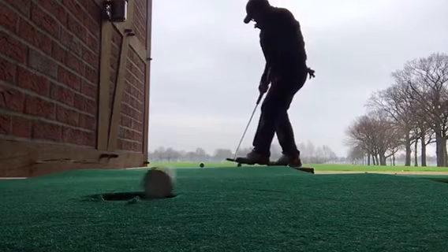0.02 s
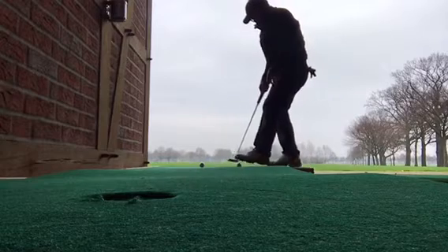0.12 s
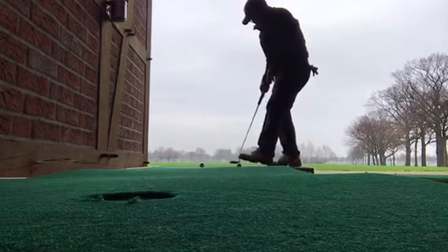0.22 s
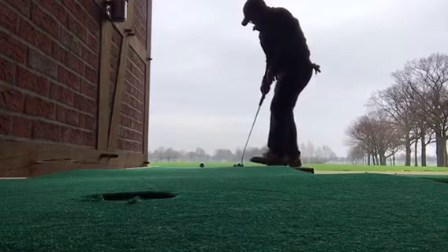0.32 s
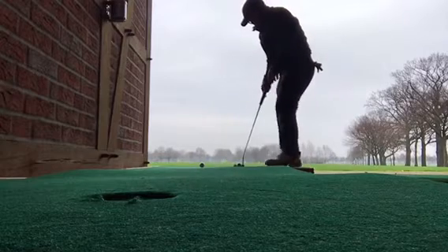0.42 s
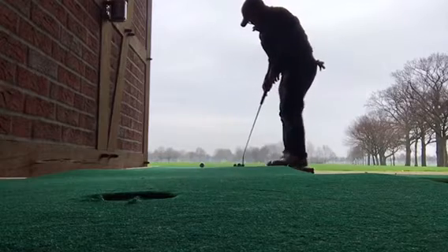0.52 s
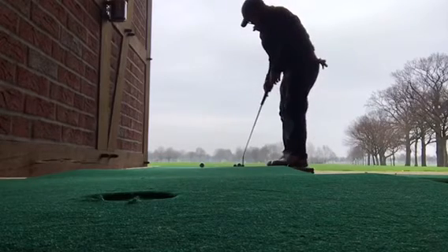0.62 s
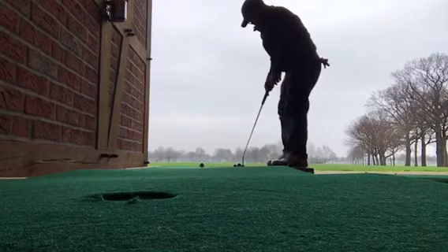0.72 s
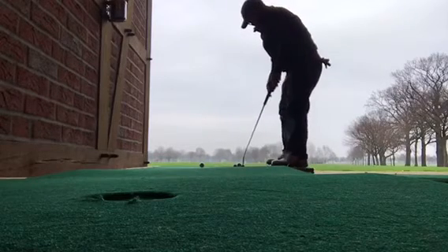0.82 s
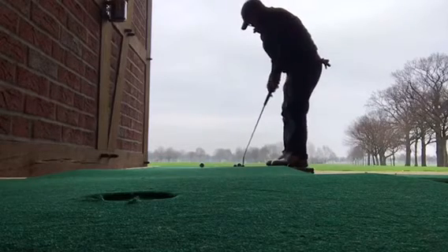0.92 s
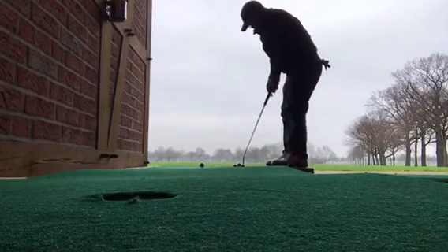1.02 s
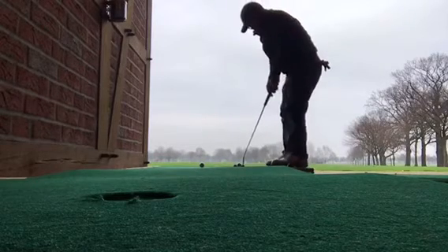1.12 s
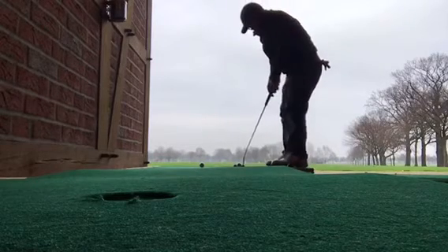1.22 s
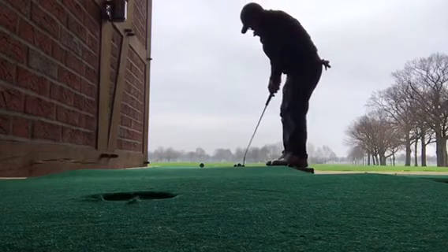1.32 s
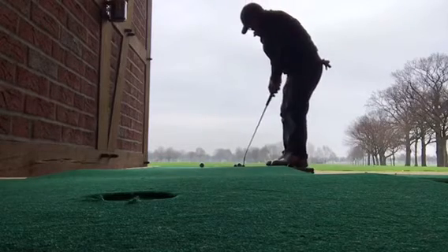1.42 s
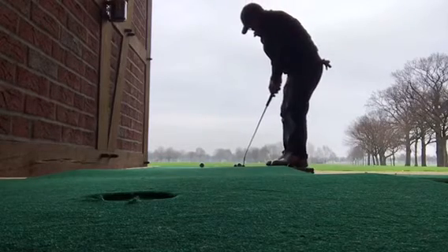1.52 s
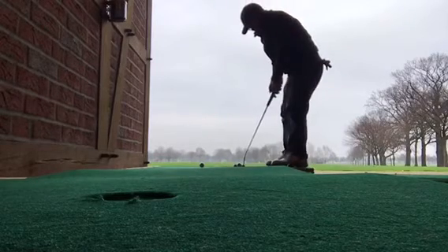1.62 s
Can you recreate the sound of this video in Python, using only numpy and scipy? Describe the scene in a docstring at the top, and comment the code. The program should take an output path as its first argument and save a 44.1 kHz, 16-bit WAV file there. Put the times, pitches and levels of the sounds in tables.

```python
"""A golf ball drops into a plastic cup and rattles and rolls round in it until it settles. Each knock excites
the damped modes of ball, cup and hollow deck, with noise bursts for the clack and crack of contact; rolling
drives the cup and deck modes with uneven noise. Before the drop the ball rumbles over artificial turf, and a
very short noise swells into the first knock. A brick wall answers with a diffuse tail, in quiet open air."""
import sys
import numpy as np
from scipy import signal
from scipy.fft import rfft, irfft, next_fast_len
from scipy.io import wavfile
from scipy.ndimage import map_coordinates

SR = 44100
rng = np.random.default_rng(int(sys.argv[2]) if len(sys.argv) > 2 else 0)


def dump_mix(stems):
    """Bounce the given channels to the path in sys.argv[1] as a 16-bit WAV at rate SR."""
    frames = np.atleast_2d(stems).T  # one column per channel
    limited = np.clip(frames, -1, 1)  # hard clip at full scale
    pcm = np.round(limited * 32767).astype(np.int16)
    wavfile.write(sys.argv[1], SR, pcm)


N = 74970


def amp(db):
    """Decibel law: the amplitude gain of a level in dB."""
    return 10 ** (np.asarray(db) / 20)


def unit(x):
    """Power normalisation: x at rms 1."""
    return x / np.sqrt(np.mean(x ** 2) + 1e-20)


def along(points, hz):
    """Logarithmic pitch scale: (frequency, value) points interpolated on a log frequency axis."""
    f, value = np.transpose(points)
    return np.interp(np.log(hz + 1), np.log(f + 1), value)


def filtered(x, response):
    """Linear filtering: the spectrum of x times a response of frequency."""
    size = next_fast_len(len(x) + SR // 2)
    spectrum = rfft(x, size) * response(np.fft.rfftfreq(size, 1 / SR))
    return irfft(spectrum, size)[:len(x)]


def noise(spectrum, size):
    """Spectral shaping: white noise coloured by a spectrum, at rms 1."""
    return unit(filtered(rng.standard_normal(size), lambda hz: amp(along(spectrum, hz))))


def wobble(rate):
    """Band-limited fluctuation: a smooth curve through random knots, rate knots a second."""
    knots = rng.standard_normal(int(N * rate / SR) + 4)
    return map_coordinates(knots, [np.arange(N) * rate / SR])


def rise(t, rise_s):
    """Finite contact time: the force builds up smoothly rather than at once."""
    return (1 - np.exp(-t / rise_s)) ** 2


def burst(colour, rise_s, t60, t):
    """Exponential decay: a coloured noise that dies by 60 dB in t60 seconds."""
    return amp(-60 * t / t60) * rise(t, rise_s) * noise(colour, size=len(t))


# scatter from knock to knock, in each mode: level [dB], log of the t60, starting phase [rad]
SCATTER_DB, DAMPING_SCATTER, PHASE_SCATTER_RAD = 3, 0.13, 0.4


def ring(modes, rise_s, detune, t):
    """Modal superposition: a blow sets off decaying sines, each a little different every time."""
    hz, db, t60 = np.transpose(modes)[:, :, None]
    size, tune, shift, damp = rng.standard_normal((4, len(modes), 1))
    fall_db = 60 * t / (t60 * np.exp(DAMPING_SCATTER * damp))
    phase = 2 * np.pi * hz * (1 + detune * tune) * t + PHASE_SCATTER_RAD * shift
    waves = amp(db + SCATTER_DB * size - fall_db) * np.sin(phase)
    return waves.sum(0) / np.linalg.norm(amp(db)) * rise(t, rise_s)


SOFT_HZ = 1500  # above this little passes


def driven(x, modes):
    """Forced resonance: x through a set of modes, with little treble passed, at rms 1."""
    def response(f):
        total = 0
        for k, (centre, db, t60) in enumerate(modes):
            width = np.log(1000) / (np.pi * t60)  # half-power bandwidth [Hz]
            damping = 1j * f * width
            # neighbouring modes have opposite signs
            total = total + (-1) ** k * amp(db) * damping / (centre ** 2 - f ** 2 + damping)
        return total / (1 + (f / SOFT_HZ) ** 4)
    return unit(filtered(x, response))


# spectrum of the open air: (frequency [Hz], relative level [dB per Hz])
AIR_SPECTRUM = [(13, -32), (40, -4.5), (125, -3), (239, -11), (560, -31.5), (2600, -43.5), (15500, -56)]
AIR_DB = -53


def air():
    """Stationary background noise: quiet outdoor rumble and hiss, gently uneven in level."""
    return amp(AIR_DB + 1.5 * wobble(4)) * noise(AIR_SPECTRUM, size=N)


# reverberation time of the wall and yard: (frequency [Hz], t60 [s])
WALL_T60 = [(150, 0.35), (800, 0.52), (3000, 0.065), (10000, 0.048)]
WALL_DB, WALL_DELAY_S = -17, 0.006


def wall(x):
    """Diffuse reverberation: a delayed noise tail in which each frequency dies at its own speed."""
    hz, t, cells = signal.stft(rng.standard_normal(SR // 2), SR, nperseg=256)
    decay = amp(-60 * t / along(WALL_T60, hz)[:, None])
    tail = signal.istft(cells * decay, SR, nperseg=256)[1]
    late = np.pad(x, (round(WALL_DELAY_S * SR), 0))
    reply = signal.fftconvolve(late, tail / np.linalg.norm(tail))[:N]
    return amp(WALL_DB) * reply


# rumble of the ball on the turf: (frequency [Hz], relative level [dB per Hz])
TURF_SPECTRUM = [(40, -23.5), (90, -5.5), (150, -1.5), (220, -12), (410, -25), (1200, -33.5), (4000, -81)]
TURF_DB, TURF_FADE_DB_PER_S = -38.5, 116  # level at the start, and its fall


def turf():
    """Rolling noise: the last low rumble on the turf dies as the ball tips over the edge."""
    t = np.arange(N) / SR
    return amp(TURF_DB - TURF_FADE_DB_PER_S * t) * rise(t, 0.002) * noise(TURF_SPECTRUM, size=N)


SWELL_S, SWELL_DB, SWELL_CLACK_DB = 0.2107, -16, -26.5  # peak time, level there, clack-coloured noise in it
SWELL_DB_PER_S = 1400.5


def swell():
    """Resonant filtering: a very short noise in the cup's pitches swells into the first knock, dies as fast."""
    t = np.arange(N) / SR - SWELL_S
    cup_noise = driven(rng.standard_normal(N), CUP_MODES)
    mixed = cup_noise + amp(SWELL_CLACK_DB) * noise(CLACK_SPECTRUM, size=N)
    return amp(SWELL_DB - SWELL_DB_PER_S * np.abs(t)) * mixed


# ball rolling on the cup floor: (time [s], rumble level [dB], hiss level [dB])
ROLL_LEVELS = [(0.205, -75.5, -81.5), (0.229, -25, -54.5), (0.341, -33.5, -66), (0.451, -40, -63),
               (.52, -39.5, -63.5), (0.899, -34, -65.5), (1.1, -36.5, -68.5), (1.269, -33, -69),
               (1.29, -38, -86), (1.47, -39.5, -78), (1.54, -58, -101), (1.7, -78.5, -99)]
# hiss of the rolling contact: (frequency [Hz], relative level [dB per Hz])
HISS_SPECTRUM = [(1200, 6.5), (3000, 9), (6500, 2), (8000, -14), (15000, -29.5)]
BUMPS_PER_S, BUMP_DB = 160, 3.5  # rate and depth of the unevenness
ROLL_CUP_DB = -14.5  # cup against the deck


def rolling():
    """Roughness excitation: the dimples drum on the cup floor, driving deck and cup; the contact hisses."""
    s, rumble_db, hiss_db = np.transpose(ROLL_LEVELS)
    t = np.arange(N) / SR
    bumps = amp(BUMP_DB * wobble(BUMPS_PER_S)) * rng.standard_normal(N)
    rumble = driven(bumps, DECK_MODES) + amp(ROLL_CUP_DB) * driven(bumps, CUP_MODES)
    hiss = unit(amp(BUMP_DB * wobble(BUMPS_PER_S)) * noise(HISS_SPECTRUM, size=N))
    return amp(np.interp(t, s, rumble_db)) * rumble + amp(np.interp(t, s, hiss_db)) * hiss


DETUNE = 0.013  # relative scatter of deck and cup frequencies from knock to knock
# modes of the hollow deck under the mat: (frequency [Hz], relative level [dB], typical t60 [s])
DECK_MODES = [(101.6, -23.5, 0.51), (123.34, -6, .25), (149.8, -10.5, 0.24), (177.1, -0.5, 0.18),
              (225.9, -1.5, 0.13), (267.5, -1, 0.1), (287.7, -3, 0.078), (348.2, -11, 0.088)]


def deck_thump(t):
    """Plate resonance: the hollow deck answers a knock with its low modes."""
    return ring(DECK_MODES, 0.0018, DETUNE, t)


# modes of the plastic cup: (frequency [Hz], relative level [dB], typical t60 [s])
CUP_MODES = [(412.1, -7.5, .1), (452, -3, 0.091), (519.3, -2.5, 0.067), (585.6, 2.5, 0.047),
             (589, 0.5, 0.037), (677, -3.5, 0.043), (718, -4.5, 0.059), (842, -1, 0.055),
             (910.7, -4.5, 0.079), (1116, -12, 0.05), (1225, -14, 0.05), (1374, -23, 0.054)]


def cup_ring(t):
    """Shell resonance: the cup answers a knock with its short-lived middle modes."""
    return ring(CUP_MODES, 0.0011, DETUNE, t)


# sharp contact noise: (frequency [Hz], relative level [dB per Hz])
CRACK_SPECTRUM = [(1500, -6), (4500, 10), (6500, 7.5), (9000, -6.5), (15000, -31)]


def contact_crack(t):
    """Broadband impact noise: a bright, brief crack."""
    return burst(CRACK_SPECTRUM, 0.00073, 0.033, t)


# rough clack of the dimpled shell on plastic: (frequency [Hz], relative level [dB per Hz])
CLACK_SPECTRUM = [(900, -6.5), (1400, 2), (1950, -1), (2450, 4), (2800, -5), (3300, -4.5), (4300, -14),
                  (4900, -29), (8000, -42)]
CLACK_DB, HARD_DB = -3.5, -25.5  # clack against the ball click, for a click at HARD_DB
CLACK_GROWS = 0.26  # dB gained per click dB above HARD_DB


def shell_clack(ball_db, t):
    """Nonlinear contact: a harder knock is rougher, so the clack grows faster than the click."""
    clack_db = ball_db + CLACK_DB + CLACK_GROWS * (ball_db - HARD_DB)
    return amp(clack_db) * burst(CLACK_SPECTRUM, 0.0006, 0.034, t)


# modes of the ball: (frequency [Hz], relative level [dB], typical t60 [s])
BALL_MODES = [(2214, -3, 0.039), (2455, 7.5, 0.027), (2715, -7.5, 0.016)]


def ball_click(t):
    """Free vibration of a solid: the ball clicks at its few high modes, detuned from knock to knock."""
    return ring(BALL_MODES, 0.00067, 0.022, t)


# knocks of the ball in the cup: (time [s], ball click level [dB], deck thump level [dB],
# cup ring level [dB], crack level [dB])
KNOCK_LEVELS = [(0.21, -15.5, -4.5, -3, -48.5), (0.222, -38, -14.5, -8.5, -60.5),
                (0.2427, -48, -24, -21.5, -46), (0.2554, -46.5, -17.5, -32, -49.5),
                (0.2727, -27.5, -20.5, -9.5, -57), (0.358, -31, -26, -15.5, -52.5),
                (0.3824, -24, -8, -7.5, -46.5), (0.4165, -24.5, -27, -6.5, -53),
                (0.4419, -38.5, -19, -13.5, -57), (0.4536, -24, -19, -9, -49.5),
                (0.534, -25.5, -11.5, -8, -44.5), (0.5928, -20, -7, -5.5, -57),
                (0.6425, -29.5, -21, -32, -55), (0.6816, -32, -21.5, -15, -47.5),
                (0.717, -28.5, -18.5, -12.5, -69), (0.7548, -23, -15, -13.5, -68.5),
                (0.8032, -23, -8.5, -6, -49), (0.8643, -26.5, -13, -13, -59),
                (0.8914, -40, -17.5, -27, -60.5), (0.9168, -39, -25.5, -32, -78.5),
                (0.9337, -40.5, -21, -30.5, -76), (0.9645, -37, -21, -26.5, -67.5),
                (0.976, -41.5, -22.5, -37.5, -85.5), (0.9917, -30.5, -28, -35.5, -70),
                (1.0101, -43.5, -18, -24.5, -70.5), (1.0238, -33.5, -31, -21, -77),
                (1.05, -37, -17, -30, -71), (1.0604, -41, -29.5, -30, -69), (1.077, -45.5, -27, -35, -87.5),
                (1.1026, -39.5, -20, -26.5, -80), (1.1237, -40.5, -20.5, -31.5, -69),
                (1.1337, -37, -20.5, -32, -70), (1.1508, -35.5, -13.5, -18.5, -64),
                (1.1745, -32, -15, -27, -84), (1.2, -42.5, -40.5, -22.5, -95),
                (1.232, -36, -15.5, -22.5, -70.5), (1.2478, -33, -21.5, -20.5, -81),
                (1.274, -47.5, -29.5, -32, -75.5), (1.3169, -47, -32, -42, -89),
                (1.3335, -40, -32.5, -29, -85), (1.3406, -34.5, -16.5, -21, -93),
                (1.402, -47, -32, -32, -86), (1.4099, -33.5, -19, -24, -85),
                (1.4426, -42.5, -20, -30, -84.5), (1.451, -39, -21.5, -37, -83.5),
                (1.466, -43.5, -26.5, -34, -90.5), (1.484, -51.5, -24, -36, -96)]


def knocks():
    """Impact excitation: each knock sounds deck, cup, clack and crack, and in a second row the ball's ring."""
    out, t = np.zeros((2, N + SR)), np.arange(SR // 2) / SR
    for s, ball_db, deck_db, cup_db, crack_db in KNOCK_LEVELS:
        ball = amp(ball_db) * ball_click(t)
        clack = shell_clack(ball_db, t)
        deck = amp(deck_db) * deck_thump(t)
        cup = amp(cup_db) * cup_ring(t)
        crack = amp(crack_db) * contact_crack(t)
        start = round(s * SR)
        # the cup has the opposite sign to the deck
        out[:, start:start + len(t)] += [clack + deck - cup + crack, ball]
    return out[:, :N]


def scene():
    """Superposition: all sources add; the ball's ring is dry, only the rest of the knocks feeds the wall's tail."""
    rattle, ball = knocks()
    return (rattle + ball + wall(rattle) + rolling() + turf() + swell())[None]


MIC_LOW_HZ, TOP_HZ = 86, 15800


def record(dry):
    """Band limiting: the scene loses its lowest bass, air is added, and all stops at TOP_HZ."""
    high_pass = signal.butter(3, MIC_LOW_HZ, "high", fs=SR, output="sos")
    thin = signal.sosfilt(high_pass, dry[0])
    return filtered(thin + air(), lambda hz: hz < TOP_HZ)[None]


dry = scene()
out = record(dry)
dump_mix(out)
```